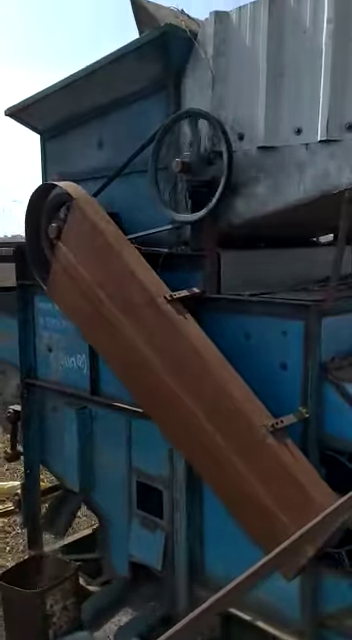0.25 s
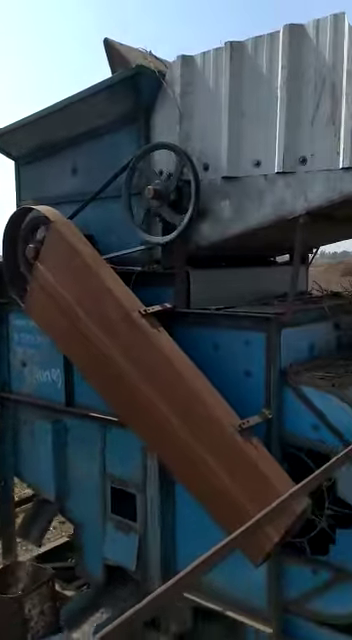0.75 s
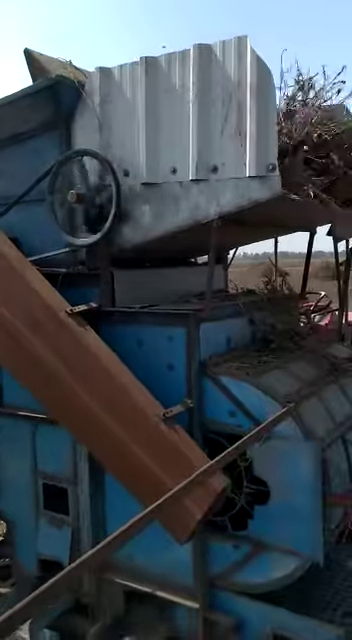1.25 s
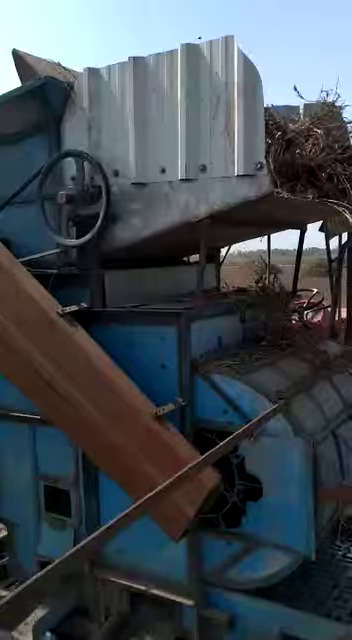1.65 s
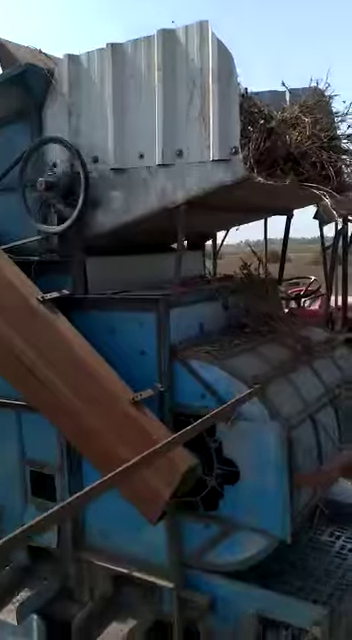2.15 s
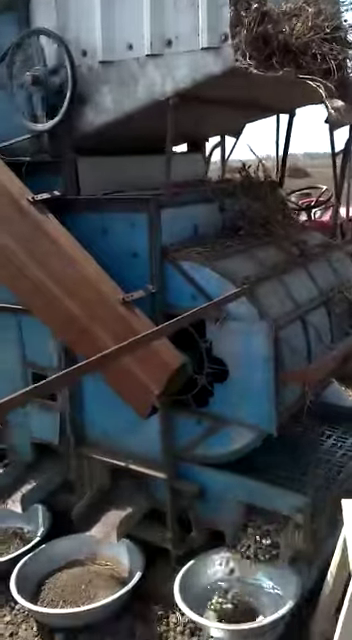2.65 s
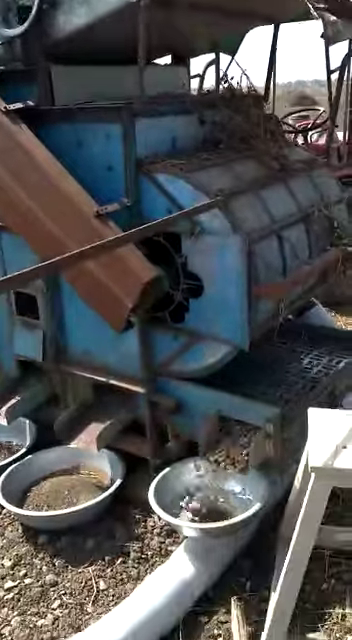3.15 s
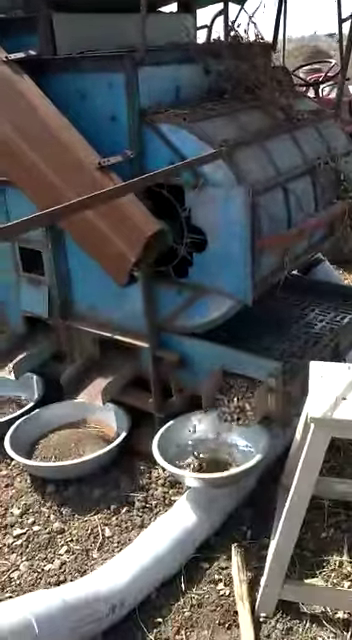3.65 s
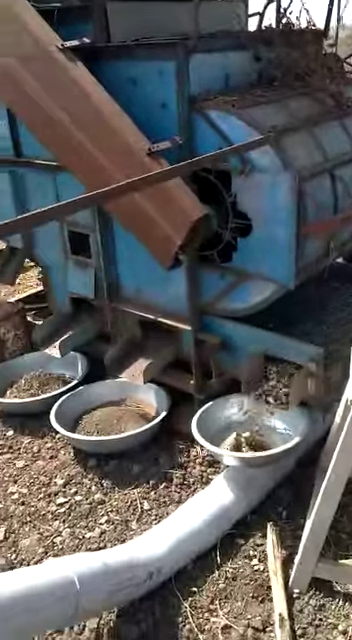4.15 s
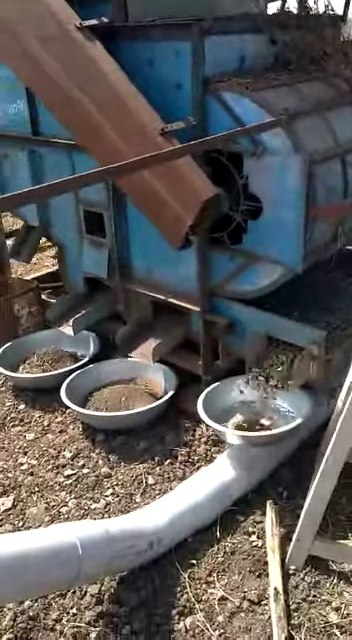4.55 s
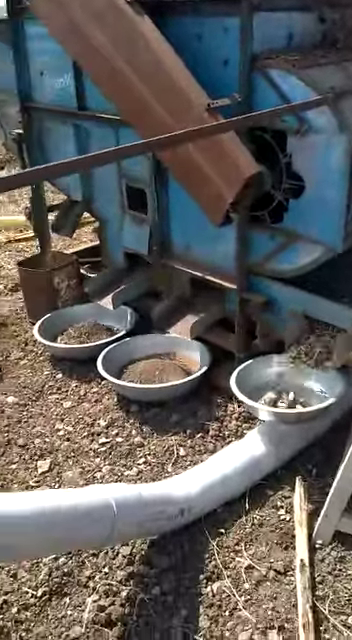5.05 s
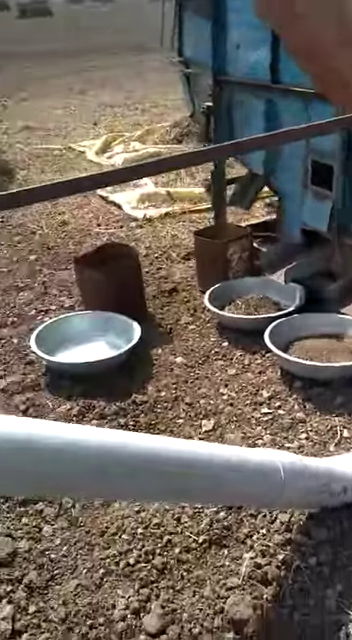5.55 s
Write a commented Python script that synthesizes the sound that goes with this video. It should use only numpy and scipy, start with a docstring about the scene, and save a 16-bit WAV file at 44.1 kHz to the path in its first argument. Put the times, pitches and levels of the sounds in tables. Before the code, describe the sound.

Loud continuous thresher drone in an open field: fan rumble, drum roar, fluttering hums, crackling stalks, knocks and a bright patter of grain on metal.

```python
"""In an open field a tractor-driven grain thresher runs, heard from a few steps away while walking along it.
Hums sit on orders of the shaft speed, the housing howls and pulleys whine; fan and drum are shaped noise.
Stalks rustle as dense tiny impacts with snaps and knocks, and the fan blows chaff and dust.
Grain hisses over steel sieves as three bands of impacts, and landing handfuls ping the steel's modes."""
import sys
import numpy as np
from scipy import signal
from scipy.fft import rfft, irfft, next_fast_len
from scipy.io import wavfile
from scipy.ndimage import uniform_filter1d, minimum_filter1d, map_coordinates

SR = 44100
rng = np.random.default_rng(int(sys.argv[2]) if len(sys.argv) > 2 else 0)


def master_out(mix):
    """Clip the mix to full scale and print it as 16-bit PCM to the path in sys.argv[1]."""
    frames = np.transpose(np.atleast_2d(mix))
    ceiling = np.clip(frames, -1, 1)
    pcm = np.round(ceiling * 32767).astype(np.int16)
    wavfile.write(sys.argv[1], SR, pcm)


N = 256216

# flow of grain on the sieves: time_s, level_db (before each layer's own trim)
GRAIN_FLOW = [(0, -20), (.65, -21.5), (.8, -18.5), (1.15, -21.5), (1.3, -19), (1.55, -20), (2.1, -19.5),
              (2.35, -21), (3.2, -21.5), (3.95, -21.5), (4.3, -22), (4.68, -21), (4.8, -19.5), (5.5, -20.5),
              (5.8, -21)]
# modes of the steel sieve: pitch_hz, level_db (relative), t60_s, facing_s (listener faces that part),
# pan_db (left minus right)
SIEVE_MODES = [(2510, -12.5, 0.24, 6.8, -10), (4180, -14, 0.086, 2, -11), (4340, 2.5, 0.11, 5.2, 0),
               (4440, -1, .2, 0.64, -2.5), (4540, -3, .1, 4.3, 6), (5470, -3, 0.041, 3.8, 0),
               (5470, -4.5, .05, 2.4, 8), (5820, 1, 0.071, 0.87, 7), (6930, -5, .035, 2.5, 0),
               (7510, -1.5, 0.04, 6.8, -1)]
# borders between large, medium and small grain, large being lowest: edge_hz
GRAIN_EDGES_HZ = [5380, 6570]


def amp(db):
    """Decibels to gain."""
    return 10 ** (np.asarray(db) / 20)


def unit(x):
    """Scale to rms 1."""
    return x / np.sqrt(np.mean(x ** 2) + 1e-20)


def along(points, hz):
    """Read (frequency, value) points on a log frequency axis."""
    f, v = np.transpose(points)
    return np.interp(np.log(hz + 1), np.log(f + 1), v)


def curves(rows):
    """One value per sample for each column after the time."""
    s, *cols = np.transpose(rows)
    return [np.interp(np.arange(N) / SR, s, c) for c in cols]


def wobble(rate):
    """A smooth random curve through rate random knots a second."""
    coarse = np.arange(0, N, 32)
    knots = rng.standard_normal(2048)
    curve = map_coordinates(knots, [coarse * rate / SR], mode="wrap")
    return np.interp(np.arange(N), coarse, curve)


def filtered(x, response):
    """Multiply the spectrum of x by a response of frequency."""
    m = next_fast_len(N + SR // 4)
    return irfft(rfft(x, m) * response(np.fft.rfftfreq(m, 1 / SR)), m)[..., :N]


def casing(hz):
    """Gain of the sheet-metal casing, raised at its resonances."""
    # casing resonances: centre_hz, width_hz, boost_db
    resonances = [(104.5, 8.1, 11.5), (211, 8.6, 6.5), (772, 29, 2.5), (1030, 57, 4), (1169, 7.5, 10),
                  (1430, 6.8, 6.5), (2114, 56, 5), (2547, 305, 7.5)]
    return amp(sum(db / (1 + (2 * (hz - centre) / width) ** 2) for centre, width, db in resonances))


def ports(pair, spectrum):
    """Colour two unrelated signals and blend them into left and right, so low bands are more alike."""
    # likeness of the two microphone ports: pitch_hz, likeness (0 to 1)
    likeness = [(40, .75), (100, .92), (200, .91), (400, .74), (800, .68), (1200, .48), (2000, .45),
                (2800, .7), (3350, .85), (3750, .85), (4000, .35), (8000, .15)]

    def response(hz):
        blend = np.arccos(np.clip(along(likeness, hz), -1, 1)) / 2
        return amp(along(spectrum, hz)) * casing(hz) * [np.cos(blend), np.sin(blend)]

    mid, side = filtered(pair, response)
    return unit(np.array([mid + side, mid - side]))


def patter(rate, spread_db, life_s):
    """Countless tiny impacts: puffs of noise of random size, each falling to 1/e in life_s."""
    sizes = amp(spread_db * np.clip(rng.standard_normal(N), -2, 2))
    hits = (rng.random(N) < rate / SR) * sizes
    power = signal.lfilter([1], [1, -np.exp(-2 / (life_s * SR))], hits ** 2)
    return unit(np.sqrt(power) * rng.standard_normal((2, N)))


def clatter(count, low_hz, high_hz, t60_s, spread_db):
    """Single hard impacts of random size, each ringing briefly at two pitches of its own."""
    n = np.arange(SR // 80)
    start = rng.integers(0, N, (count, 1))
    size = amp(spread_db * np.minimum(rng.exponential(size=(count, 1)), 3))
    hz = rng.uniform(low_hz, high_hz, (2, count, 1))
    ring = size * amp(-60 * n / SR / t60_s) * np.sin(2 * np.pi * hz * n / SR).sum(axis=0)
    bearing = 2 * np.pi * rng.random((count, 1))
    where = (start + n).ravel()
    pair = [np.bincount(where, (ring * way(bearing)).ravel(), N)[:N] for way in (np.cos, np.sin)]
    return unit(np.array(pair))


def blows(rows, t60_s):
    """Power over time of (time, dB) bursts that start within milliseconds and die away in t60_s."""
    t = np.arange(SR // 4) / SR
    attack = 1 - np.exp(-t / 0.0007)
    power = np.zeros(N + SR)
    for s, db in rows:
        power[round(s * SR):][:len(t)] += (amp(db - 60 * t / t60_s) * attack) ** 2
    return power[:N]


def fan():
    """Fan rumble: shaped noise at one mean level, swaying a little with its eddies."""
    # fan spectrum: pitch_hz, density_db (shape only)
    fan_spectrum = [(20, -57), (45, -44), (62, -22), (80, -11), (105, -10.5), (150, -1), (210, -1),
                    (260, 0), (350, -1), (500, -3.5), (900, -44)]
    sway_db = wobble(5) + 0.9 * wobble(22)
    return amp(-22.5 + sway_db) * ports(rng.standard_normal((2, N)), fan_spectrum)


def drum(angle):
    """Drum roar: dense impacts chopped a little by the passing beaters."""
    # drum spectrum: pitch_hz, density_db (shape only)
    drum_spectrum = [(200, -30), (350, -4), (480, -2), (650, 4), (850, 2.5), (1050, -3), (1400, -5),
                     (2200, -31), (4000, -65)]
    # drum roar as the listener walks past: time_s, level_db (before a 1 dB cut)
    roar = [(0, -23), (1.8, -25), (2.3, -21), (2.8, -21), (3.6, -21), (5, -20), (5.8, -22.5)]
    roar_db, = curves(roar)
    chop = 1 + 0.13 * np.cos(4 * angle) + 0.06 * np.cos(angle)
    impacts = chop * patter(rate=1900, spread_db=1.5, life_s=0.0028)
    return amp(roar_db - 1 + 0.56 * wobble(6)) * ports(impacts, drum_spectrum)


def chaff():
    """The fan blows out an even stream of husks, with a diffuse hiss of dust on top."""
    # spectra of husks and dust: pitch_hz, density_db (shape only)
    husk_spectrum = [(1500, -26), (2000, -14), (2700, -6), (3100, -1), (3500, 2), (3800, 1), (4300, -14),
                     (6000, -40)]
    dust_spectrum = [(7500, -53), (9000, 2.5), (12000, 1), (15000, -11)]
    # strength of the husk stream: time_s, level_db
    stream = [(0, -33), (2, -32.5), (3.4, -31.5), (5.8, -31)]
    stream_db, = curves(stream)
    husk_patter = patter(rate=2500, spread_db=4, life_s=0.005)
    dust_patter = patter(rate=3000, spread_db=3, life_s=0.004)
    husks = amp(stream_db + 1.1 * wobble(30)) * ports(husk_patter, husk_spectrum)
    dust = amp(-30 + 0.8 * wobble(8)) * ports(dust_patter, dust_spectrum)
    return husks + dust


def hum(angle):
    """Sines on shaft orders, fading and fluttering as the load varies and the listener moves."""
    # the four strongest hums: time_s, fourth_db, eighth_db, fifteenth_db, twentieth_db (shaft orders)
    drones = [(0, -25, -28, -27, -41), (.2, -29.5, -28, -32, -33), (.42, -27, -32, -46, -39),
              (.6, -34.5, -32, -43, -39), (.82, -26.5, -36, -35, -31), (1.05, -32, -33, -41, -37),
              (1.5, -30, -32, -34, -39), (1.7, -36, -28.5, -35, -38), (1.92, -25.5, -29, -28, -38),
              (2.1, -33, -34, -33, -41), (2.3, -23.5, -42, -35, -42), (2.47, -35, -42, -31, -37),
              (2.6, -27, -45, -33, -40), (2.8, -28, -26, -29, -33), (3, -27, -30.5, -22, -34),
              (3.38, -27.5, -26, -36, -33), (3.65, -28.5, -29.5, -23, -32), (3.8, -23, -25.5, -29, -37),
              (3.95, -32, -28, -26, -35), (4.2, -24.5, -30.5, -28.5, -40), (4.6, -26.5, -27.5, -28.5, -34),
              (4.9, -27, -29, -35, -37), (5.1, -32, -38, -27, -36), (5.25, -29, -34, -27, -37),
              (5.58, -29, -30, -31, -38), (5.8, -33, -29, -30, -33)]
    # weaker hums of the drive: order (multiple of shaft speed), level_db (before the swell below)
    weak_orders = [(5, -38), (6, -39), (10, -38), (11, -55), (13, -37), (14, -45), (16, -36), (17, -40),
                   (18, -41), (21, -42), (23, -39.5), (28, -44.5)]
    # swell of the weaker hums along the machine: time_s, gain_db
    weak_swell = [(0, 3), (.6, 1.5), (2.4, 5), (2.8, 2), (3.55, 4), (4.3, 4.5), (5, -0.5), (5.8, -6)]
    swell_db, = curves(weak_swell)
    orders = list(zip((4, 8, 15, 20), curves(drones)))
    orders += [(order, db + swell_db) for order, db in weak_orders]
    out = np.zeros((2, N))
    for order, db in orders:
        flutter_db = 0.4 * wobble(3) + 2 * wobble(19) - 1
        phase = order * angle + 2 * np.pi * rng.random() + 0.1 * np.sqrt(order) * wobble(15)
        # each side drifts slowly in phase on its own
        drift = 0.041 * order * np.array([wobble(1.0), wobble(0.99)])
        out += amp(db + flutter_db) * np.sqrt(2) * np.sin(phase + drift)
    return out


def howl(angle):
    """The housing sings on shaft orders in rough swells; the pulleys whine on two rough tones."""
    # howl swells: start_s, length_s, level_db
    howl_swells = [(0.045, 0.12, -19), (0.234, 0.099, -19.5), (0.374, 0.049, -23), (0.473, 0.06, -21.5),
                   (0.585, 0.1, -21), (0.75, 0.046, -25), (2.69, 0.45, -30.5), (3.445, 0.13, -23.5),
                   (4.003, 0.21, -31)]
    # howl tones: order (multiple of shaft speed), level_db (relative)
    tones = [(11, -11), (12, 1), (20, -26), (23, -21), (28, -24.5)]
    # thin whine of the belt pulleys: time_s, level_db
    pulleys = [(0, -27.5), (.5, -32.5), (1.2, -27.5), (1.6, -38), (5.8, -34)]
    rise_s, fall_s, rest_db = 0.022, 0.12, -37.5
    flutter_db, flutter_rate, jitter_rad = 2, 45, 0.3
    t = np.arange(N) / SR
    level = np.full(N, amp(rest_db))
    for s, length, db in howl_swells:
        rise = (t - s) / rise_s
        fall = 1 - (t - s - length) / fall_s
        level += amp(db) * np.clip(np.minimum(rise, fall), 0, 1)
    voice = np.zeros(N)
    for order, db in tones:
        strength = amp(db + flutter_db * wobble(flutter_rate))
        voice += strength * np.sin(order * angle + jitter_rad * wobble(flutter_rate))
    whine_db, = curves(pulleys)
    low = np.sin(28 * angle + 0.5 * wobble(25))
    high = np.sin(43.8 * angle + 1.3 * wobble(70))
    whine = amp(whine_db + 4 * wobble(30.57)) * (amp(-4.5) * low + high)
    return (level * voice + whine) * amp([[-2.5], [2]])  # panned to the right


def stalks(angle):
    """Dry stalks rustle, more once every turn, and snap; stems knock as bursts and loose sheet rattles."""
    # crop going through the beaters, in swelling armfuls: time_s, level_db (before a 2.5 dB cut)
    armfuls = [(0, -22.5), (.64, -23), (.77, -17), (.9, -20.5), (1.1, -24), (1.3, -21.5), (1.44, -19),
               (1.65, -22.5), (2.2, -21.5), (2.38, -20), (2.55, -23.5), (2.8, -23), (3.25, -24),
               (3.85, -25), (4, -23), (4.35, -26), (5.02, -21), (5.25, -24.5), (5.5, -26), (5.62, -22),
               (5.8, -23)]
    # pods and thick stems knocking in the drum: start_s, level_db
    knocks = [(.0618, -24), (.172, -19), (.347, -14.5), (.549, -19), (.808, -24), (1.045, -16),
              (1.158, -15.5), (1.425, -21), (1.613, -14.5), (1.7415, -14), (1.796, -16), (1.864, -15),
              (1.928, -17), (2.129, -17), (2.202, -21), (2.412, -15), (2.537, -22), (2.769, -16),
              (3.135, -20), (3.246, -20), (3.368, -18), (3.544, -19), (3.9, -25), (3.961, -27),
              (4.283, -18), (4.566, -20), (5.014, -21), (5.601, -18.5), (5.735, -17)]
    # stalk spectrum: pitch_hz, density_db (shape only)
    stalk_spectrum = [(500, -20), (900, -3), (1200, 0.5), (1600, 1), (2000, -1.5), (2600, -8), (3000, -11),
                      (3500, -30.5), (4200, -6), (9000, -45)]
    feed_db, = curves(armfuls)
    clumps_db = 1.15 * wobble(30) + 0.5 * wobble(9)
    feed = amp(feed_db - 2.5 + clumps_db)
    rustle = patter(rate=4000, spread_db=0.5, life_s=0.0093) * (1 + 0.065 * np.cos(angle))
    snaps = clatter(count=1500, low_hz=946, high_hz=3700, t60_s=0.026, spread_db=5.5)
    rattle = clatter(count=350, low_hz=700, high_hz=2800, t60_s=0.03, spread_db=4)
    hard = amp(-6) * ports(snaps, stalk_spectrum) + amp(-9) * ports(rattle, stalk_spectrum)
    rustle_level = np.sqrt(feed ** 2 + blows(knocks, t60_s=0.12))
    return rustle_level * ports(rustle, stalk_spectrum) + feed * hard


def facing(s, best_s):
    """Loss in dB of a sieve mode when the listener is not level with the part that radiates it."""
    most_db, width_s = 11.5, 1.06
    return most_db * (np.exp(-((s - best_s) / width_s) ** 2) - 1)


def ringing():
    """Grain sliding over the steel keeps each mode shimmering, as a narrow band of noise."""
    ring_db, width_hz = -14, 130
    flow_db, = curves(GRAIN_FLOW)
    t = np.arange(N) / SR
    out = np.zeros((2, N))
    for hz, db, _, best_s, pan_db in SIEVE_MODES:
        noise = rng.standard_normal((2, N))
        band = unit(filtered(noise, lambda f: 1 / (1 + ((f - hz) / width_hz) ** 2)))
        pan = amp([[pan_db / 2], [-pan_db / 2]])
        out += amp(flow_db + ring_db + db + facing(t, best_s)) * pan * band
    return out


def handfuls():
    """Rows of time and large, medium, small grain dB: heavy landings plus light ones scattered among them."""
    # heaviest handfuls landing on the sieves: start_s, large_db, medium_db, small_db
    heavy = [(.172, -31, -31, -24), (.4083, -18.5, -12, -13), (.437, -17.5, -19, -21),
             (.572, -29, -21, -18), (.892, -32, -27, -27), (1.0001, -24, -23.5, -31),
             (1.121, -24, -26, -24), (1.2516, -35, -25, -20), (1.268, -21, -22, -25),
             (1.3404, -25, -17, -29), (1.5337, -18.5, -25, -32), (1.6135, -26, -23, -30),
             (1.767, -20, -26, -32), (1.8706, -24, -23, -25), (1.903, -25, -17, -21),
             (2.058, -28, -17, -23), (2.1147, -24, -19, -24), (2.2557, -20, -28, -25),
             (2.318, -22, -20, -18), (2.591, -31, -25, -32), (2.64, -27, -23, -32), (2.745, -24, -31, -22),
             (2.777, -31, -19, -26), (2.8434, -28, -25, -23), (2.976, -36, -33, -19),
             (3.253, -21, -31, -17), (3.368, -25, -22.5, -30), (3.553, -29, -34, -23),
             (3.6955, -27, -24, -15), (3.727, -24, -24, -16), (3.7758, -19.5, -26, -27),
             (3.8636, -21.5, -24, -25), (3.955, -23, -23, -33), (3.993, -31, -22, -23),
             (4.117, -24, -29, -21), (4.284, -23, -35, -23), (4.349, -34, -36, -25),
             (4.4498, -19.5, -34, -28), (4.6597, -32, -26, -29), (4.742, -23, -19, -14),
             (4.782, -36, -21, -27), (4.8633, -21.5, -27, -17), (4.955, -19, -27, -20),
             (5.1205, -17, -27, -18), (5.35, -30, -25, -16), (5.4215, -31, -21, -11.5),
             (5.44, -28, -32, -21), (5.459, -25, -33, -15), (5.503, -38, -31, -20), (5.5697, -26, -17, -22),
             (5.746, -33, -22, -29), (5.787, -32, -21, -29)]
    count, light_db, spread_db = 40, -27, 5
    draws = rng.random((count, 4))
    slot_s = N / SR / count
    light = []
    for k, row in enumerate(draws):
        levels_db = light_db + spread_db * (2 * row[1:] - 1)
        light.append(((k + row[0]) * slot_s, *levels_db))
    return list(heavy) + light


def sieves(landings):
    """Three sizes of grain slide and hiss with each landing handful; single kernels tick on the steel."""
    # grain spectrum: pitch_hz, density_db (shape only)
    grain_spectrum = [(2000, -19), (3000, -0.5), (3600, -20), (4000, 4), (4400, 1.5), (5000, 2.5),
                      (5700, -0.5), (6400, -3), (7400, -1), (8000, -4.5), (10000, -2.5), (12000, -4),
                      (15000, -22)]
    # share of large, medium and small grain in the flow: level_db
    size_db = [-11, -8.5, -8]
    # the housing hides the top of the sieves' sound: pitch_hz, gain_db
    shield = [(8200, 0), (9000, -4)]
    shake_hz, shake_peak_s, shake_db = 7.2, 0.064, 1
    flow_db, = curves(GRAIN_FLOW)
    flow_db = flow_db + shake_db * np.cos(2 * np.pi * shake_hz * (np.arange(N) / SR - shake_peak_s))

    def above(hz, edge):
        return 1 / (1 + (edge / (hz + 100)) ** 20)

    low, high = GRAIN_EDGES_HZ
    shares = [
        lambda hz: 1 - above(hz, low),
        lambda hz: above(hz, low) * (1 - above(hz, high)),
        lambda hz: above(hz, high),
    ]
    kernels = clatter(count=2000, low_hz=3856, high_hz=9520, t60_s=0.024, spread_db=4.5)
    out = amp(flow_db - 8) * ports(kernels, grain_spectrum)
    for k, share in enumerate(shares):
        # grain comes unevenly from the drum
        uneven_db = 0.3 * wobble(5.38) + 2 * wobble(55)
        sliding = amp(flow_db + size_db[k] + uneven_db)
        splashes = blows([(s, dbs[k]) for s, *dbs in landings], t60_s=0.11)
        level = np.sqrt(sliding ** 2 + splashes)
        crowd = ports(patter(rate=3400, spread_db=5, life_s=0.0032), grain_spectrum)
        out = out + level * unit(filtered(crowd, lambda hz: np.sqrt(share(hz))))
    return filtered(out, lambda hz: amp(along(shield, hz)))


def pings(landings):
    """Each handful rings the steel at new strengths: large grain the low modes, small grain the high ones."""
    ping_db, spread_db = 4.5, 2
    t = np.arange(SR // 4) / SR
    attack = 1 - np.exp(-t / 0.0014)
    rings = np.zeros((2, N + SR))
    hz, mode_db, t60_s, best_s, pan_db = np.transpose(SIEVE_MODES)[:, :, None]
    shape = (2, len(SIEVE_MODES), 1)  # side, mode, time
    pan = np.array([pan_db, -pan_db]) / 2
    for s, *dbs in landings:
        blow_db = np.array(dbs)[np.searchsorted(GRAIN_EDGES_HZ, hz)]
        random_db = spread_db * rng.standard_normal(shape)
        strength_db = ping_db + mode_db + blow_db + facing(s, best_s) + pan + random_db
        waves = np.sin(2 * np.pi * (hz * t + rng.random(shape)))
        modes = amp(strength_db) * amp(-60 * t / t60_s) * waves
        rings[:, round(s * SR):][:, :len(t)] += attack * modes.sum(axis=1)
    return rings[:, :N]


def scene():
    """Every layer of the thresher, a little to the right, so its sound reaches that port first."""
    # shaft speed: time_s, speed_hz (turns per second)
    shaft = [(0, 33.6), (.6, 33.7), (1.7, 33.55), (2.8, 33.56), (3.2, 33.48), (5.05, 33.55), (5.35, 33.45),
             (5.8, 33.53)]
    # balance of all but the sieves as the listener turns: time_s, balance_db (left minus right)
    balance = [(0, 2.5), (2, 1.5), (3.6, 1.5), (5.8, 3)]
    # balance between the ports: pitch_hz, balance_db (left minus right)
    port_balance = [(60, -2.5), (300, -2), (550, -3), (900, -3.5), (1500, -2), (2500, 0.6), (3400, -1),
                    (4400, 0), (5200, -2), (7000, -3.5), (8000, 3.5), (10000, 3.5)]
    # phase between the ports: pitch_hz, left_lead_rad (negative when the right leads)
    port_lead = [(50, 0), (300, -.1), (450, -.4), (800, -.4), (1100, -1), (1640, -1.8), (2400, -2.9),
                 (2800, -3.2), (3800, -3.15), (4450, -5.8), (5300, -3.9), (6500, -5.8), (7600, -9)]
    speed, = curves(shaft)
    balance_db, = curves(balance)
    angle = 2 * np.pi * np.cumsum(speed + 0.024 * wobble(5.89)) / SR
    side = np.array([[0.5], [-0.5]])
    landings = handfuls()
    body = fan() + drum(angle) + chaff() + hum(angle) + howl(angle) + stalks(angle)
    steel = ringing() + sieves(landings) + pings(landings)
    machine = amp(side * balance_db) * body + steel

    def between_ports(hz):
        return amp(side * along(port_balance, hz)) * np.exp(1j * side * along(port_lead, hz))

    return filtered(machine, between_ports)


def limit(x):
    """Turn the gain down smoothly around any peak over the limit."""
    ceiling, window_s = 0.85, 0.004
    size = round(window_s * SR)
    needed = np.minimum(1, ceiling / (np.abs(x).max(axis=0) + 1e-9))
    return x * uniform_filter1d(minimum_filter1d(needed, 2 * size), size)


def record(dry):
    """A narrow band shared by both sides drops out, treble steps down, peaks are limited, the top ends."""
    # gain of what both sides share, hollow near 3.5 kHz: pitch_hz, gain_db
    shared_gain = [(3250, 0), (3330, -5), (3400, -42), (3680, -42), (3780, -8), (3950, 0)]
    # overall response, stepping down above 8 kHz: pitch_hz, gain_db
    treble_step = [(8000, 0), (8130, -8), (8250, -31), (8850, -31), (9050, -20), (15000, -21)]
    common = dry.mean(axis=0)
    pair = dry - common + filtered(common, lambda hz: amp(along(shared_gain, hz)))
    coloured = filtered(pair, lambda hz: amp(along(treble_step, hz)))
    return filtered(limit(coloured), lambda hz: hz < 15000)


dry = scene()
out = record(dry)
master_out(out)
```